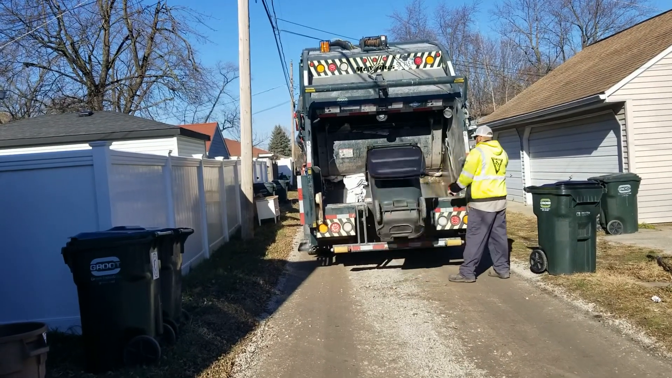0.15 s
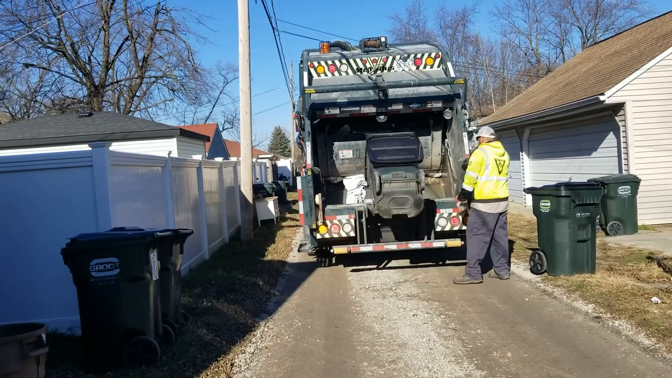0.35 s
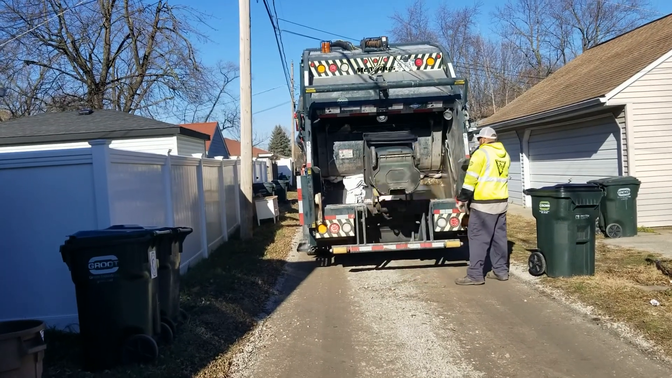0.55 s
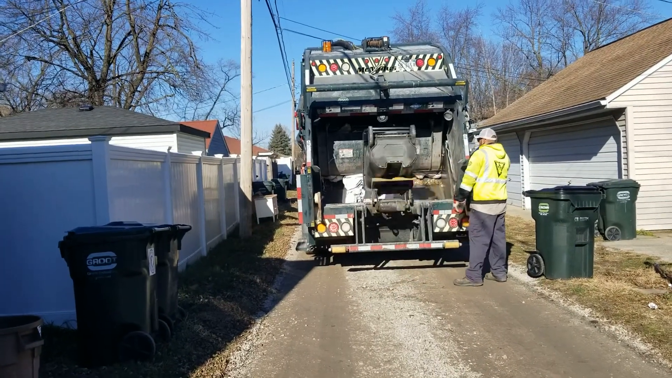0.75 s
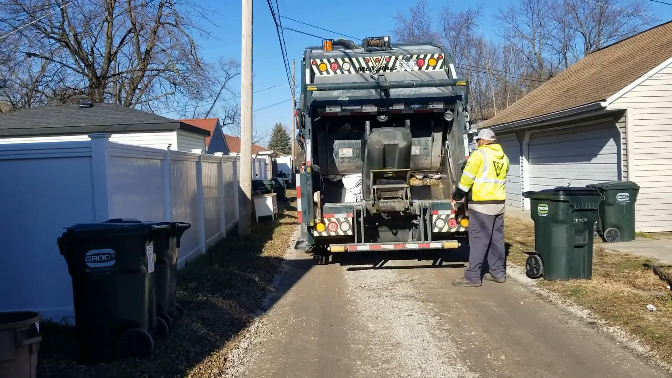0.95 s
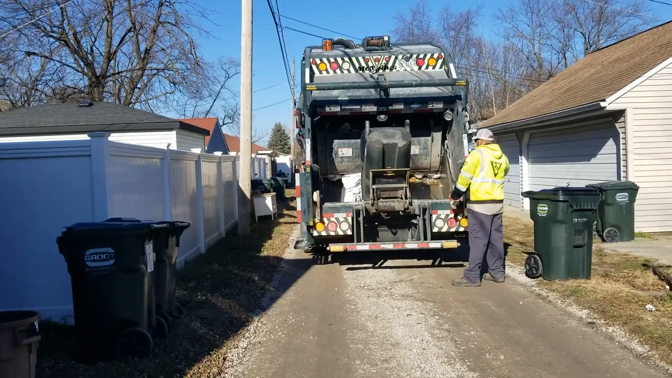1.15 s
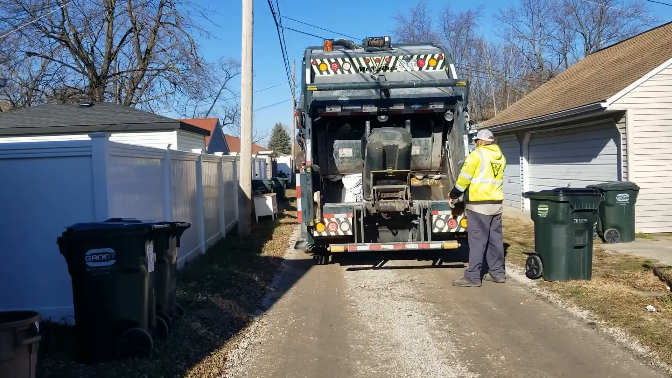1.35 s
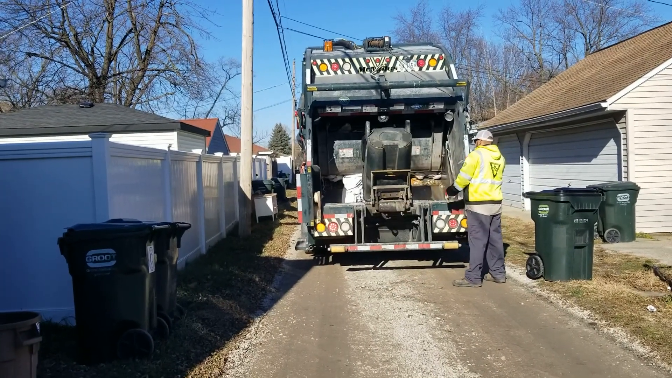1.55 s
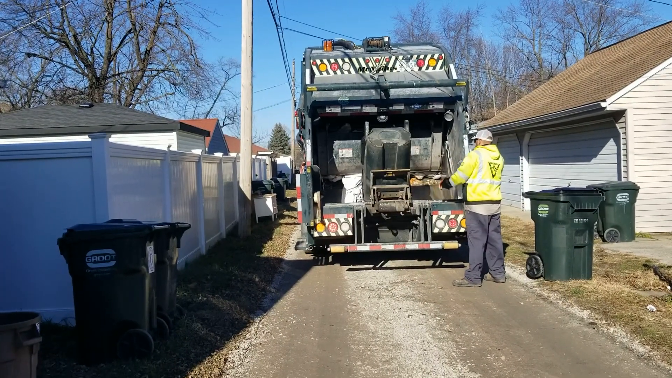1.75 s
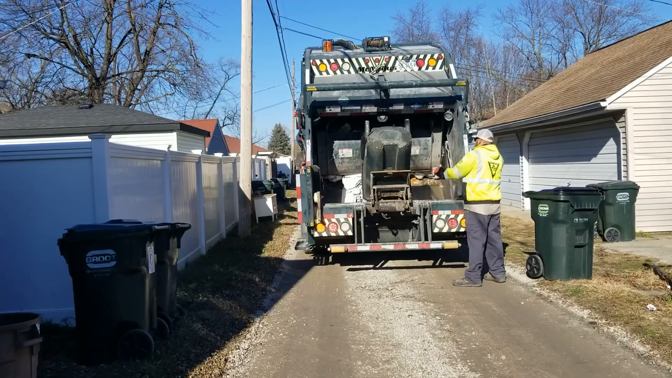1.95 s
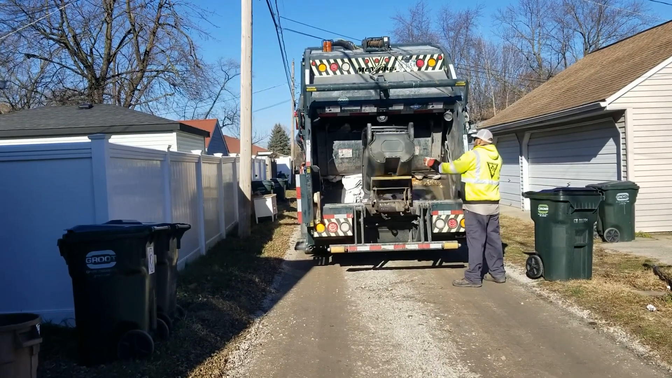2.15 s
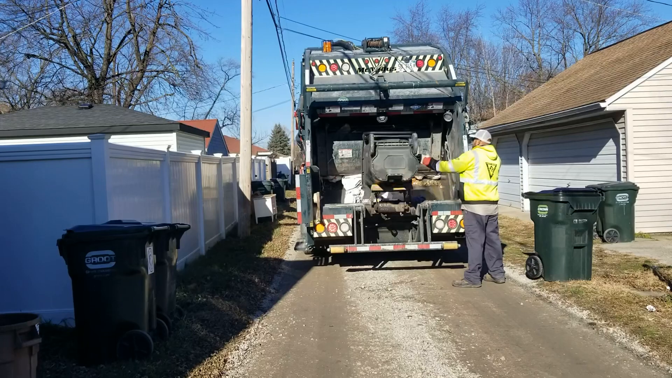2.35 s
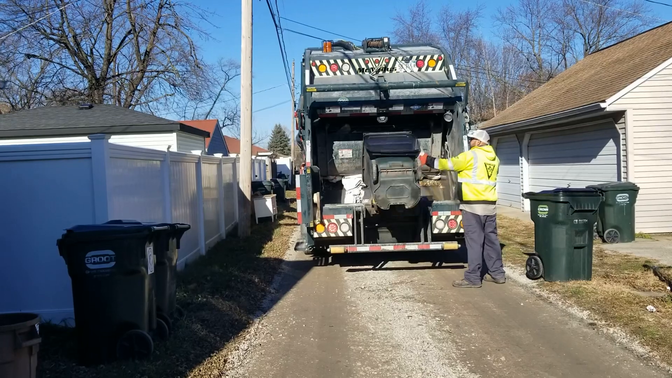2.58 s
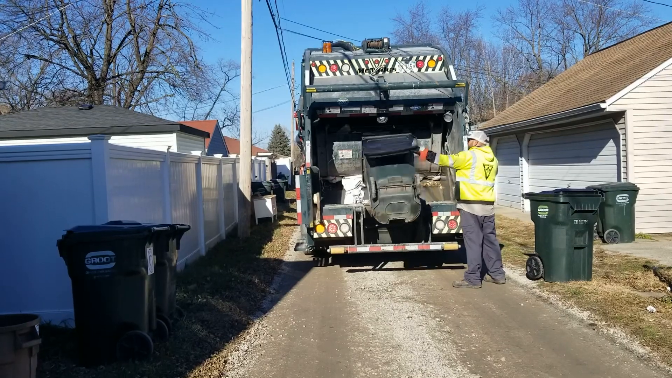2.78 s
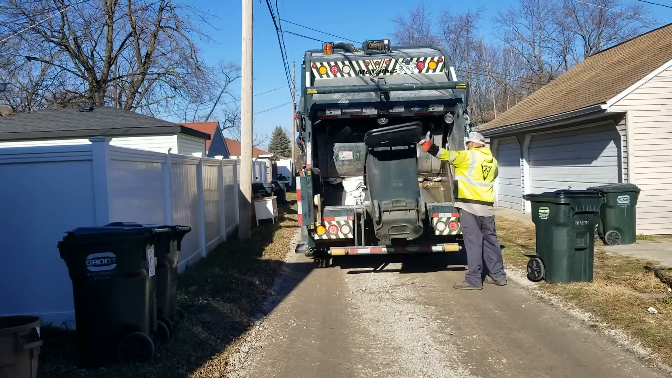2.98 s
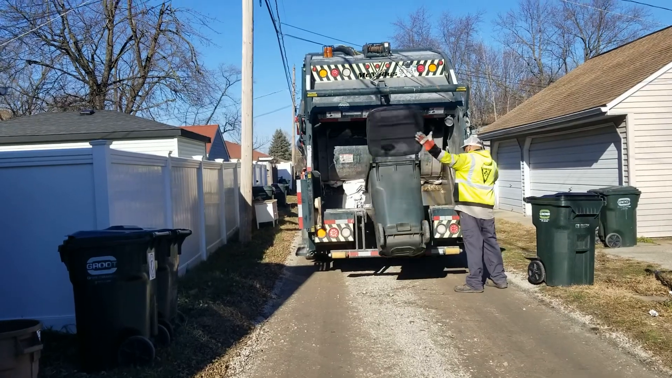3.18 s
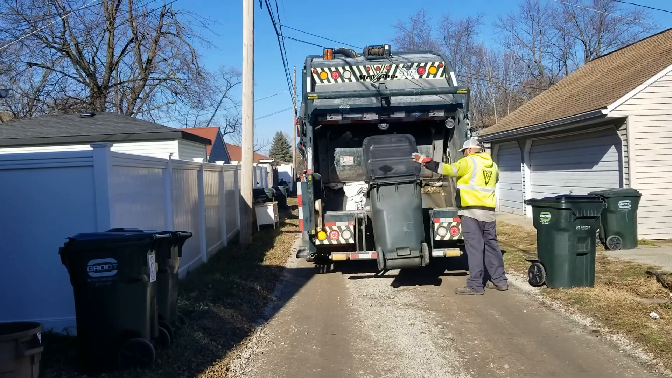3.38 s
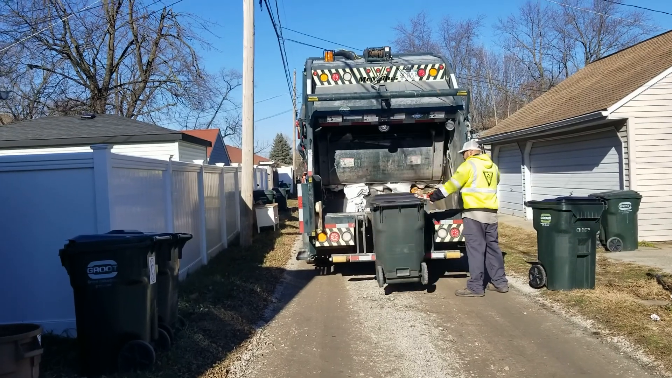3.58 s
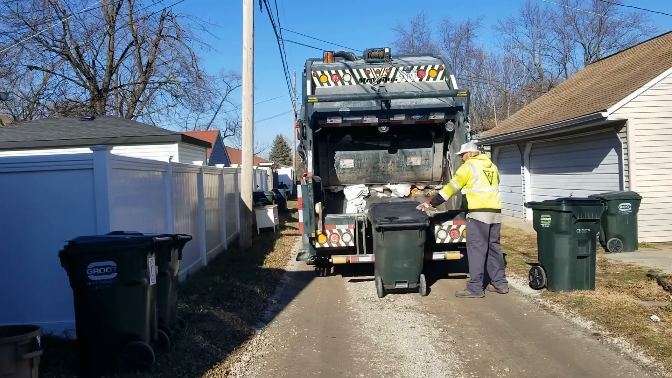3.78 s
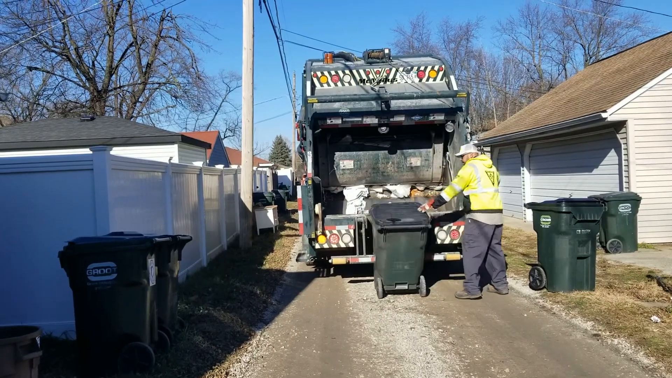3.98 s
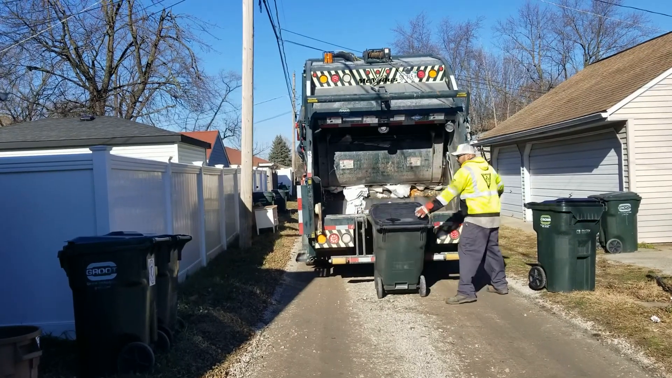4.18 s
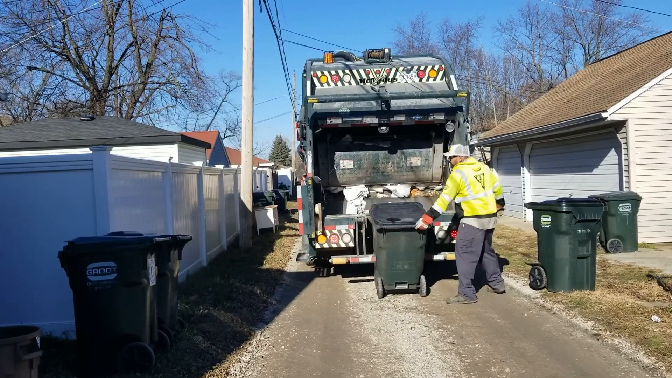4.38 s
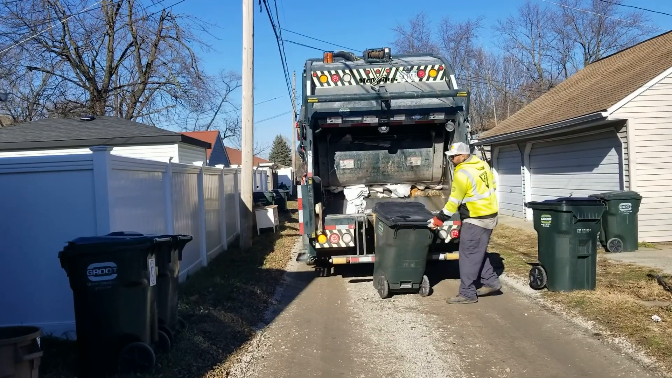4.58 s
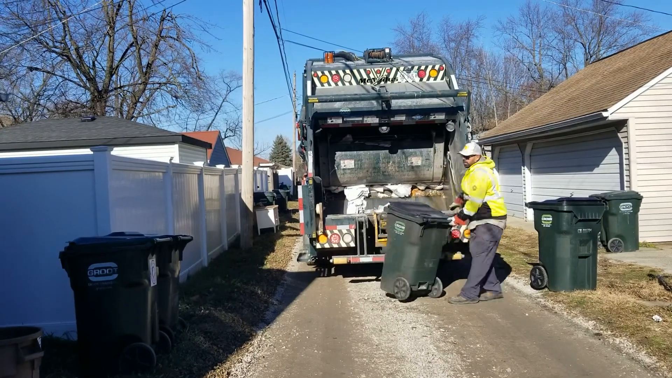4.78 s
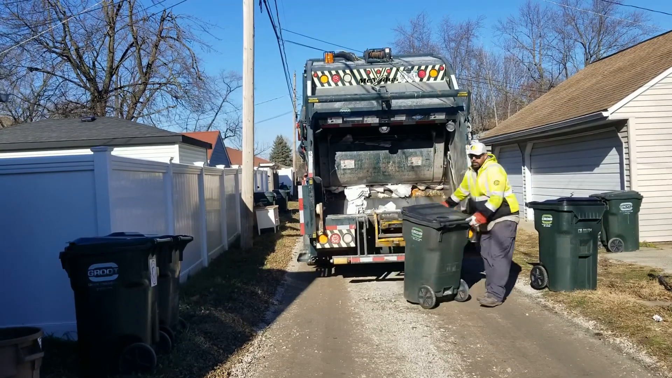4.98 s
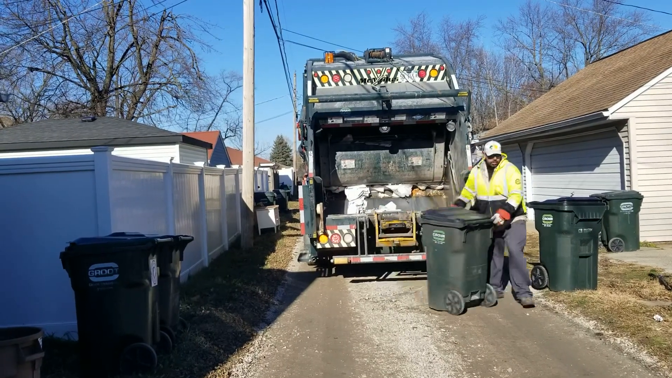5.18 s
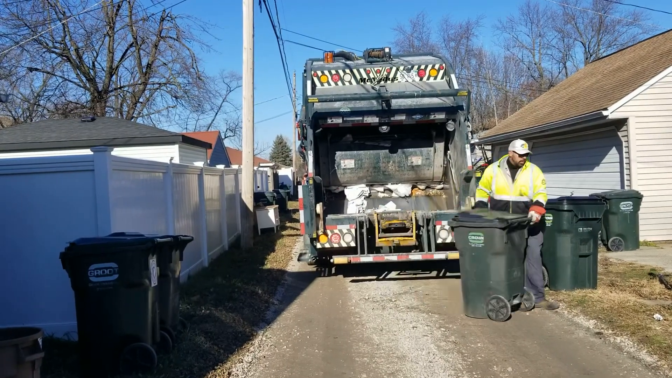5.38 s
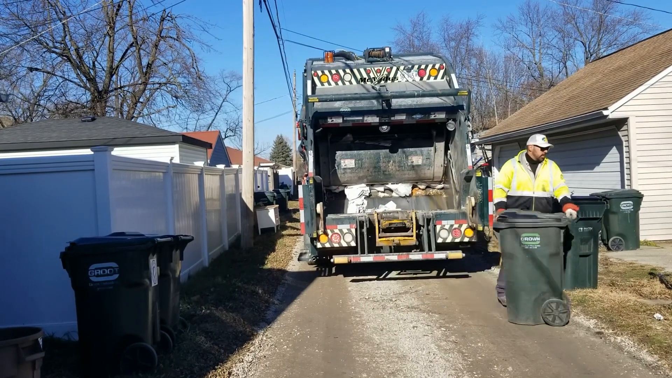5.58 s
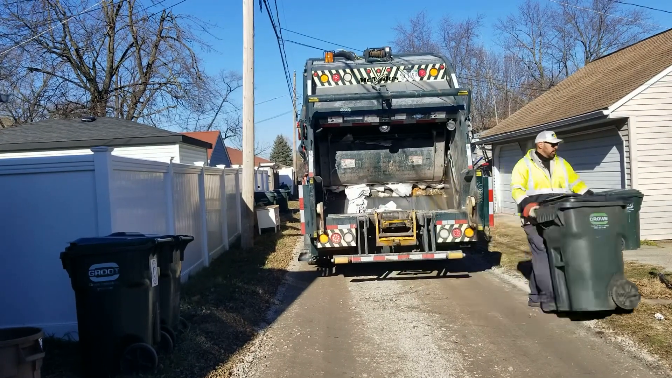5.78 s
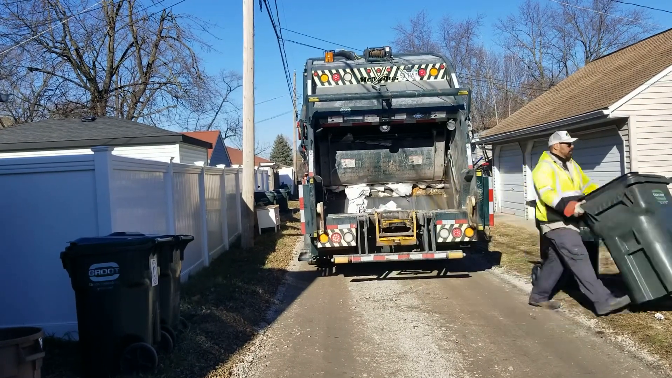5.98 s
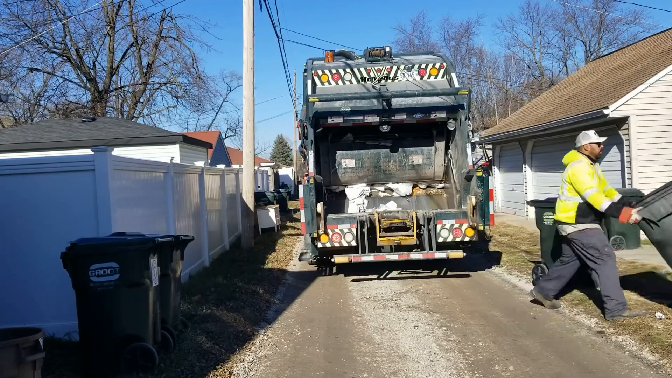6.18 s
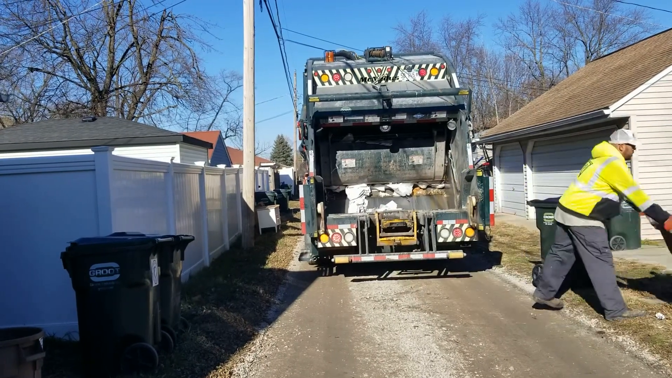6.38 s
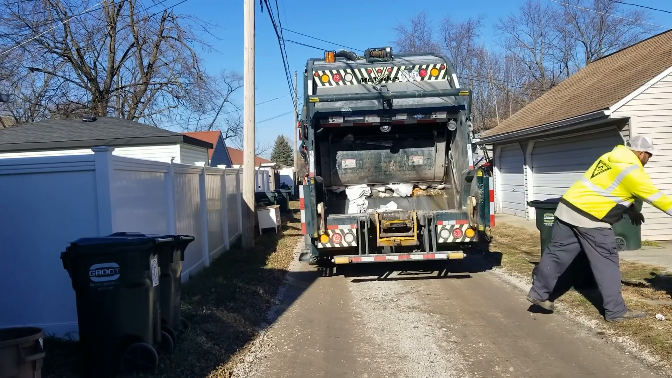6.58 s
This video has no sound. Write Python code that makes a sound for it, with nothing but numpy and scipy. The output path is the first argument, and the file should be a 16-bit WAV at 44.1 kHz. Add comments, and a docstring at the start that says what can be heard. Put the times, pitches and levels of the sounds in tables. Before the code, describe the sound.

Outdoors in an alley, a rear-loading garbage truck drones and clatters, heard from a few metres behind. The engine revs as the hydraulic tipper hisses and whines upward, with metallic bangs, a short dry squeal and latch clanks. Rubbish slides and bags rustle. More bangs follow as the cart comes down, its lid slams and the plastic shell thuds on the ground, then is wheeled off with hollow bumps and crunching steps.

```python
"""A rear-loading garbage truck stands in an alley: its diesel hums and revs as modulated sines over clatter noise.
A hydraulic tipper lifts a plastic cart with hiss and whine, blows ring the steel hopper, and a dry pivot squeals.
The latch clanks, rubbish slides and bags rustle; a valve whistles as the cart comes down.
The lid slams and the cart drops off, ringing its shell modes; boots crunch and wheels roll over broken paving.
Fence, garage and hopper return decaying noise as echoes of all the handling."""
import sys
import numpy as np
from scipy import signal
from scipy.fft import rfft, irfft
from scipy.io import wavfile
from scipy.ndimage import uniform_filter1d

SR = 44100
rng = np.random.default_rng(int(sys.argv[2]) if len(sys.argv) > 2 else 0)


def master(y):
    """Save y as 16-bit WAV."""
    cut = np.clip(np.atleast_2d(y).T, -1, 1)
    pcm = np.round(cut * 32767)  # scale
    wavfile.write(sys.argv[1], SR, pcm.astype(np.int16))


N = 292824
T = np.arange(N) / SR


def undb(db):
    """Level to amplitude: 20 dB is a factor of ten."""
    return 10 ** (np.asarray(db) / 20)


def unit(x):
    """Normalisation to an rms of 1."""
    return x / np.sqrt(np.mean(x ** 2) + 1e-20)


def curves(table):
    """Linear interpolation of a table's columns over time."""
    times, *columns = np.transpose(table)
    return [np.interp(T, times, column) for column in columns]


def walk(rate):
    """Band-limited random modulation: twice-smoothed random steps with an rms of 1."""
    length = int(SR / rate)
    steps = np.repeat(rng.standard_normal(N // length + 1), length)
    smooth = uniform_filter1d(uniform_filter1d(steps, length), length)
    return unit(smooth[:N])


def gate(start, end, attack_s, release_s):
    """Exponential growth up to the start, a hold, and exponential decay after the end."""
    return np.exp(np.minimum(T - start, 0) / attack_s - np.maximum(T - end, 0) / release_s)


def spells(table, attack_s, release_s):
    """Envelope of separate spells, the strongest prevailing; rows are start t/s, end t/s, level/dB."""
    return np.max([undb(db) * gate(start, end, attack_s, release_s) for start, end, db in table], axis=0)


def colour(x, points):
    """Minimum-phase filtering: a folded cepstrum turns f/Hz, level/dB points into a causal response."""
    size = 4096
    hz, db = np.transpose(points)
    bins_hz = np.fft.rfftfreq(size, 1 / SR)
    gain_db = np.interp(np.log(bins_hz + 1), np.log(hz), db)
    cepstrum = irfft(np.log(undb(gain_db)))
    cepstrum[1:size // 2] *= 2
    cepstrum[size // 2 + 1:] = 0
    response = irfft(np.exp(rfft(cepstrum)))
    return signal.fftconvolve(x, response[None], axes=-1)[:, :x.shape[-1]]


def resonate(x, modes):
    """Modal superposition: the push itself plus the ring of every mode."""
    rings = [undb(db) * signal.lfilter(*signal.iirpeak(hz, hz / width, fs=SR), x) for hz, width, db in modes]
    return x + sum(rings)


# side signal against mid: f/Hz, level/dB
SIDE_COLOUR = [(125, -20), (250, -11.5), (500, -9.5), (1000, -2), (4000, 2), (12000, -1)]


def spread(pair):
    """Mid-side diffuseness: two unrelated signals give like bass and diffuse treble."""
    side = colour(pair[1:], SIDE_COLOUR)[0]
    return np.array([pair[0] + side, pair[0] - side])


# exhaust note, six cycles to a crank turn: t/s, f/Hz, level/dB
EXHAUST_NOTE = [(0, 112.4, -28), (.27, 113.7, -31.5), (.8, 127, -33.5), (1.2, 158.9, -25),
                (1.55, 172.9, -21.5), (1.77, 176.3, -20.5), (1.95, 172, -20), (2.35, 157.6, -23),
                (2.7, 149.8, -29), (3.05, 146.4, -27), (3.36, 142.5, -32.5), (3.46, 142.3, -48),
                (3.98, 142.7, -43.5), (4.16, 142.5, -31.5), (4.55, 145.1, -25.5), (5.45, 141.8, -27.5),
                (6.05, 139.2, -30.5), (6.64, 140.6, -31)]


def exhaust_note():
    """Engine speed governs pitch: exhaust frequency and level through time."""
    return curves(EXHAUST_NOTE)


# the tipper lifts, holds, lowers and settles: start t/s, end t/s, oil hiss level/dB, hiss fading/(dB per s),
# pump whine level/dB, injector clatter level/dB, chassis rumble level/dB (levels before the machinery's trims)
TIPPER_STROKES = [(-.1, 0.836, -49, -2, -47, -45.5, -43), (0.917, 2.412, -54, 2.5, -68, -42, -36.5),
                  (2.447, 3.426, -59.5, 2, -47, -45, -40.5), (3.496, 3.95, -58, 4, -63, -42.5, -39)]
LOAD_RISE_S, LOAD_FALL_S = .089, .09
# the same four sounds with the tipper at rest
IDLE_DB = [-71, -59.5, -48, -44]
PUMP_FADE_DB_PER_S = 2


def load():
    """Hydraulic loading: each stroke raises hiss, pump, clatter and rumble above idle."""
    gains = undb(IDLE_DB)[:, None] * np.ones(N)
    for start, end, hiss_db, hiss_fade, *others_db in TIPPER_STROKES:
        stroke = undb([hiss_db, *others_db])[:, None] * gate(start, end, LOAD_RISE_S, LOAD_FALL_S)
        elapsed = np.clip(T - start, 0, end - start)
        stroke[:2] *= undb(-np.outer([hiss_fade, PUMP_FADE_DB_PER_S], elapsed))
        gains = np.maximum(gains, stroke)
    return gains


# weaker crank orders: multiple of the crank rate, mean level/dB
CRANK_ORDERS = [(3, -51), (4, -49), (5, -53), (12, -55), (18, -60), (24, -57), (30, -60)]


def engine(exhaust_hz, exhaust_db, flutter_db=.6, throb_db=1.5):
    """Harmonic orders of rotation: a fluttering exhaust drone, slowly throbbing under load, and crank orders."""
    phase = 2 * np.pi * np.cumsum(exhaust_hz) / SR
    crank = phase / 6
    working = gate(TIPPER_STROKES[0][0], TIPPER_STROKES[-1][1], LOAD_RISE_S, LOAD_FALL_S)
    drone_db = exhaust_db + flutter_db * walk(35) + throb_db * working * walk(12.1)
    drone = undb(drone_db) * np.sin(phase)
    orders = sum(undb(db + 2 * walk(9)) * np.sin(k * crank + .5 * walk(6)) for k, db in CRANK_ORDERS)
    return np.sqrt(2) * (drone + orders)


# multiple of the exhaust note; mean level at top speed and its fall per Hz below
GEAR_RATIO, GEAR_DB, GEAR_DB_PER_HZ = 9.25, -46, .45


def gears(exhaust_hz):
    """Gear meshing at a fixed ratio: a wavering whine that comes up with the revs."""
    phase = 2 * np.pi * np.cumsum(GEAR_RATIO * exhaust_hz) / SR + .4 * walk(25)
    below_top_hz = exhaust_hz.max() - exhaust_hz
    return np.sqrt(2) * np.sin(phase) * undb(GEAR_DB - GEAR_DB_PER_HZ * below_top_hz + 2 * walk(15))


# pipes and oil tank that radiate the pump's harmonics: f/Hz, width f/Hz, level/dB
PIPE_MODES = [(651, 100, -11.5), (1512, 22, 3), (1950, 80, 10.5)]


def pump_whine(exhaust_hz, gain, second_db=-13, third_db=-20):
    """Source and resonator: harmonics of the geared pump swell as they cross the pipe resonances."""
    phase = 2 * np.pi * np.cumsum(4.44 * exhaust_hz) / SR
    harmonics = [undb(db + 2 * walk(24.47)) * np.sin(k * (phase + .48 * walk(22)))
                 for k, db in enumerate((0, second_db, third_db), 1)]
    return np.sqrt(2) * resonate(sum(harmonics), PIPE_MODES) * gain


# panels of the truck body: f/Hz, width f/Hz, level/dB
BODY_PANELS = [(496, 67, 1.5), (730, 20, 3), (973, 95, 9.5), (1085, 93, 4), (1535, 164, 6.5),
               (2010, 86, -6), (2870, 43, -13)]
# spectral density of the combustion clatter: f/Hz, relative level/dB
CLATTER_SPECTRUM = [(140, -40.5), (230, -8), (296, -1.5), (328, -5.5), (354, -9.5), (536, -12.5), (650, -5),
                    (813, -22), (1080, -18.5), (1810, -20), (1980, -15.5), (2200, -19), (2710, -20.5),
                    (3330, -25), (8000, -37.5), (10400, -78), (17600, -120)]


def clatter(exhaust_hz, gain, knock_depth=.025, repeat_db=1, trim_db=3):
    """Cyclostationary noise: combustion clatter partly repeats each engine cycle and rings the panels."""
    cycles = np.cumsum(exhaust_hz) / SR / 12  # two crank turns each
    size = 3600
    position = cycles % 1 * size
    pattern = np.array([np.interp(position, np.arange(size), p) for p in rng.standard_normal((2, size))])
    firing = np.cos(np.pi * np.cumsum(exhaust_hz) / SR)
    knocks = rng.standard_normal((2, N)) + undb(repeat_db) * pattern
    knocks *= (1 + knock_depth * firing) * undb(1.25 * walk(40))
    return unit(spread(colour(resonate(knocks, BODY_PANELS), CLATTER_SPECTRUM))) * gain * undb(trim_db)


# spectral density of the chassis rumble: f/Hz, relative level/dB
RUMBLE_SPECTRUM = [(20, -16), (33, -2), (46, 12), (62, 9), (85, 2), (115, 7.5), (160, 8.5), (210, 0.5),
                   (300, -28.5), (450, -36), (900, -67)]


def rumble(gain, trim_db=3, heave_db=2):
    """Band-shaped random vibration: chassis noise with a slow heave in level."""
    noise = spread(colour(rng.standard_normal((2, N)), RUMBLE_SPECTRUM))
    return unit(noise) * gain * undb(trim_db + heave_db * walk(5.05))


# narrow resonances of the oil valve: f/Hz, width f/Hz, level/dB
OIL_VALVE_MODES = [(7120, 60, -1), (10300, 50, -4), (11400, 80, -5), (12500, 900, -12)]
# spectral density of the oil hiss: f/Hz, relative level/dB
HISS_SPECTRUM = [(300, -29), (2000, -29), (4000, -25), (6000, 9), (7500, 3.5), (9000, 6), (11500, 6.5),
                 (13000, 4), (16000, 3)]


def oil_hiss(gain, trim_db=2):
    """Flow noise: oil forced through the valve excites its narrow resonances."""
    oil = colour(resonate(rng.standard_normal((2, N)), OIL_VALVE_MODES), HISS_SPECTRUM)
    return unit(oil) * gain * undb(trim_db + .36 * walk(28))


# what the contacts radiate: f/Hz, relative level/dB
CONTACT_SPECTRUM = [(25, -16), (60, 0), (200, -1), (500, -3), (1000, -6), (2000, -9), (3200, -11),
                    (5000, -19), (6500, -20), (8000, -26), (12500, -24), (16000, -29)]
# boom, body, clack and tick: low f/Hz, high f/Hz, ring relative to the blow's t60, trim level/dB, side share
BLOW_RANGES = [(39.2, 230, 1.59, -2, 0.056), (224, 1100, 1.26, -5, 0.24), (1037, 2640, 1.16, -5.5, 0.65),
               (4040, 12900, 1.14, -1.5, 1)]
CLACK_SHARE = .58  # hardness lifts the tick fully and the clack by this share
BLOW_RISE_S = .001


def blows(table, modes, db, clack_db, tick_db, chatter_db, snap, snap_s=.022, place_db=3):
    """Impact excitation: dying chatter rings the struck body, brighter for hard contacts."""
    count = SR // 2
    t = np.arange(count) / SR
    onset = (1 - np.exp(-t / BLOW_RISE_S)) * (1 + snap * np.exp(-t / snap_s))
    out = np.zeros((2, N + count))
    for s, strength, thump, hardness, t60 in table:
        levels = strength + np.array([thump, 0, clack_db + CLACK_SHARE * hardness, tick_db + hardness])
        jolts = np.repeat(rng.standard_normal(count // 64 + 1), 64)[:count]
        push = rng.standard_normal((2, count)) * undb(chatter_db * jolts)
        push = colour(push * onset, CONTACT_SPECTRUM)
        # the place of the blow decides which modes speak
        struck = [(hz, width, gain + place_db * rng.standard_normal()) for hz, width, gain in modes]
        start = int(s * SR)
        for level_db, (lo, hi, ring, trim_db, side) in zip(levels, BLOW_RANGES):
            band = signal.butter(3, [lo, hi], "band", fs=SR, output="sos")
            fading = push * np.exp(-np.log(1000) * t / (t60 * ring))
            near = [m for m in struck if lo / np.sqrt(2) < m[0] < hi * np.sqrt(2)]
            pair = signal.sosfilt(band, resonate(fading, near))
            pair /= np.std(pair[:, :int(.03 * SR)], axis=1, keepdims=True)  # level of the first 30 ms
            stereo = pair[0] + side * np.outer([1, -1], pair[1])
            out[:, start:start + count] += undb(level_db + trim_db + db) * stereo
    return out[:, :N]


def impulses(table):
    """Impulse train: one for each row that begins t/s, level/dB."""
    times, db = np.transpose(table)[:2]
    return np.bincount((times * SR).astype(int), undb(db), N)[:N]


def contacts(table, modes, db, soft_hz):
    """Impulse response: the first touch of each blow is a single push that sounds the body's modes."""
    push = signal.lfilter(*signal.butter(2, soft_hz, fs=SR), signal.unit_impulse(SR // 4))
    click = resonate(colour(push[None], CONTACT_SPECTRUM), modes)
    return undb(db) * signal.fftconvolve(impulses(table), click[0] / np.abs(click).max())[:N]


# blows of tipper and rubbish: t/s, strength level/dB, extra thump level/dB, contact hardness level/dB, base t60 t/s
BLOWS_ON_HOPPER = [(.048, -35, 4.5, 1, 0.5), (.319, -23.5, -0.5, -2, 0.095), (.362, -28, 4, 4, 0.21),
                   (.488, -34.5, -8, -2, 0.054), (.551, -34, 3.5, 4.5, .12), (.598, -32, -11, 6, 0.24),
                   (.847, -33.5, -1, 6, 0.36), (.917, -27.5, 6.5, -6, 0.31), (.931, -25.5, 4.5, 9.5, 0.13),
                   (.949, -21.5, 2, -29, 0.17), (.992, -26, 6.5, -8, 0.12), (1.053, -33, 5, -2, 0.23),
                   (1.120, -24.5, -2.5, -5.5, 0.14), (1.171, -29, 3.5, 1.5, 0.078),
                   (1.216, -32.5, 6, 2, 0.35), (1.294, -21, -9, -10, 0.15), (1.334, -38, 12, 11, 0.18),
                   (1.379, -28, -4.5, 5.5, 0.53), (1.933, -27.5, -19, 0, 0.13), (2.008, -24.5, 2, 2, 0.17),
                   (2.042, -29.5, 9.5, -13, .18), (2.139, -30.5, 1, -12, 0.2), (2.263, -29.5, -1, -7, .15),
                   (2.348, -26, -3, -4, 0.29), (2.413, -23.5, -9, 1, 0.26), (2.474, -37, 13.5, 7.5, .13),
                   (2.807, -34.5, 5, -21, 0.21)]
# the steel hopper: f/Hz, width f/Hz, mean level/dB
STEEL_MODES = [(47.6, 10.7, 27.5), (69.5, 5.1, -2), (103, 8.1, 21.5), (162, 30, 6), (232, 13, -6),
               (352, 39, 9.5), (552, 133, 14.5), (689.5, 14, 19), (1045, 124, 8), (1587, 220, 4.5),
               (1945, 150, 4), (2910, 74, 6), (4160, 220, -1)]


def hopper():
    """Modal ringing of struck steel: tipper and rubbish strike the hopper."""
    out = blows(BLOWS_ON_HOPPER, STEEL_MODES, db=-2, clack_db=-2.5, tick_db=-18.5, chatter_db=2, snap=.38)
    return out + contacts(BLOWS_ON_HOPPER, STEEL_MODES, db=-.5, soft_hz=3000)


# dry pivot: t/s, mean f/Hz, level/dB
PIVOT_SQUEAL = [(.58, 2150, -65), (.602, 2167, -27), (.623, 2175, -23), (.645, 2218, -32),
                (.672, 2190, -27.5), (.69, 2181, -21.5), (.713, 2178, -38.5), (.738, 2162, -32),
                (.78, 2136, -73)]


def squeal(second_db=-21, third_db=-22):
    """Stick-slip friction: the tipper's pivot sounds near one steel resonance, with weak harmonics."""
    hz, db = curves(PIVOT_SQUEAL)
    phase = 2 * np.pi * np.cumsum(hz * (1 + .0027 * walk(206.2))) / SR
    harmonics = [undb(d + 2 * walk(64.5)) * np.sin(k * phase + .5 * walk(221.5))
                 for k, d in enumerate((second_db, third_db), 2)]
    sounding = (T > PIVOT_SQUEAL[0][0]) * (T < PIVOT_SQUEAL[-1][0])
    return np.sqrt(2) * (np.sin(phase) + sum(harmonics)) * undb(db) * sounding


def pan(x, right_db):
    """Interaural level difference: the balance tips to the right."""
    return x * undb(np.array([[-right_db], [right_db]]) / 2)


# the tipper's steel latch snapping against its bar: t/s, level/dB
LATCH_CLANKS = [(.849, -24), (.927, -21), (1.935, -30), (2.010, -20), (2.351, -29)]
# the ring of the latch: f/Hz, level/dB, t60 t/s
LATCH_RING = [(960, -19.5, 0.48), (1572, -4, 0.1), (1678, -4, 0.055), (1620, -19, 0.19), (2420, -33, 0.11),
              (2800, -23, 0.12), (4210, -31, .08)]


def latch():
    """Damped free vibration: short steel rings, slightly out of phase between the microphones."""
    t = np.arange(SR // 3) / SR
    ring = sum(undb(db - 60 * t / t60) * np.sin(2 * np.pi * hz * t + .26 * rng.standard_normal((2, 1)))
               for hz, db, t60 in LATCH_RING)
    return signal.fftconvolve(impulses(LATCH_CLANKS)[None], ring, axes=-1)[:, :N]


def random_hits(rate, scatter_db):
    """Poisson-like shot noise: stereo contacts at a mean rate per second, scattered in strength."""
    hits = (rng.random(N) < rate / SR) * undb(scatter_db * np.clip(rng.standard_normal(N), -2, 2))
    return hits * rng.standard_normal((2, N))


def rattle(table, modes, rate, scatter_db, top_hz, attack_s, release_s):
    """Random modal excitation: many small contacts, dulled by softness, ring a body."""
    pushes = signal.lfilter(*signal.butter(1, top_hz, fs=SR), random_hits(rate, scatter_db))
    ringing = resonate(colour(pushes, CONTACT_SPECTRUM), modes)
    return unit(spread(ringing)) * spells(table, attack_s, release_s)


# loose rubbish slides: start t/s, end t/s, level/dB
RUBBISH_SLIDES = [(1.05, 1.55, -35.5), (2.05, 2.42, -39.5)]


def rubbish():
    """Random modal excitation: sliding rubbish rings the hopper."""
    return rattle(RUBBISH_SLIDES, STEEL_MODES, rate=220, scatter_db=3, top_hz=3501, attack_s=.045, release_s=.1)


def crackle(table, rate, scatter_db, low_hz, attack_s, release_s):
    """High-passed shot noise: spells of dense, bright ticks."""
    bright = signal.lfilter(*signal.butter(2, low_hz, "high", fs=SR), random_hits(rate, scatter_db))
    return unit(bright) * spells(table, attack_s, release_s)


# plastic bags tumble out: start t/s, end t/s, level/dB
BAG_RUSTLES = [(1.3, 1.42, -47), (1.52, 1.58, -47), (1.72, 1.85, -50)]


def bags():
    """Shot noise of thin plastic: tumbling bags rustle in dense ticks."""
    return crackle(BAG_RUSTLES, rate=2700, scatter_db=-2, low_hz=3900, attack_s=.028, release_s=.045)


# loudest moment, mean level there, fall on either side
WHISTLE_S, WHISTLE_DB, WHISTLE_DB_PER_S = 3.16, -55, 45


def valve_whistle(exhaust_hz, whistle_hz=2690):
    """Flow tone: the valve whistles as the cart comes down, its pitch weakly following engine speed."""
    hz = whistle_hz * (exhaust_hz / 145) ** .3
    tone = np.sin(2 * np.pi * np.cumsum(hz) / SR + 1.1 * walk(40))
    level_db = WHISTLE_DB - WHISTLE_DB_PER_S * np.abs(T - WHISTLE_S)
    return np.sqrt(2) * undb(level_db + 2 * walk(27.2)) * tone


# knocks of the cart's lid, shell and wheels:
# t/s, strength level/dB, extra thump level/dB, contact hardness level/dB, base t60 t/s
KNOCKS_OF_CART = [(3.505, -17.5, 5.5, 7.5, 0.2), (3.514, -15, -0.5, 12, 0.21), (3.53, -15.5, -4, 8, 0.2),
                  (3.557, -20, -8, 0, 0.13), (3.718, -19.5, 0.5, -14, .16), (3.744, -27, -2.5, -15, .18),
                  (3.783, -20.5, 0.5, -18, 0.16), (3.824, -29, 3.5, 1.5, 0.15),
                  (3.856, -31, -9, 15.5, 0.19), (3.966, -27.5, -2, -2.5, 0.18), (4.494, -40.5, 7, 5, 0.1),
                  (4.764, -39, 8.5, 9, .16), (4.869, -24, 6, -16, .16), (4.893, -23, 7, 5.5, 0.18),
                  (4.94, -22.5, 3, -10, 0.31), (5.044, -21, 0.5, -6, 0.62), (5.135, -24.5, 4.5, 6, 0.15),
                  (5.217, -22, 1, -22, .18), (5.286, -16.5, -2, -18, 0.18),
                  (5.327, -16.5, 1.5, -13.5, 0.17), (5.363, -15.5, -8, -16.5, 0.16),
                  (5.426, -26, 5.5, -5, 0.42), (5.466, -19.5, 2.5, -6, .19), (5.486, -19.5, -3, -2, 0.21),
                  (5.526, -19, 2.5, -11, 0.3), (5.616, -18, -7, -12, 0.19), (5.634, -24, 9.5, -2, .17),
                  (6.341, -26.5, 8, -1.5, .19), (6.371, -33.5, 9, 6, .2), (6.449, -31, 11, 9, .18)]
# the hollow plastic cart: f/Hz, width f/Hz, mean level/dB
PLASTIC_MODES = [(79.7, 7.5, 22.5), (108, 41, 20), (146, 10.2, 18.5), (178.6, 19.5, 21), (233.6, 49, 12),
                 (321, 36, 10.5), (395, 22, 8.5), (477, 68, 11.5), (587, 103, 11), (664, 26, 13),
                 (932, 4, -22), (1108, 160, 7), (1250, 14, -21), (1578, 100, 9), (1750, 100, 2),
                 (2093, 68, 5), (2860, 79, 3), (3264, 21, 4.5), (4250, 530, -2.5)]
# wheels run over broken paving: start t/s, end t/s, level/dB
WHEEL_ROLLS = [(4.92, 5.3, -35.5), (5.3, 5.7, -38), (6.38, 6.58, -41.5)]


def cart(low_hz=60):
    """Modal ringing of a hollow shell: lid, drop and rolling wheels excite the plastic cart."""
    out = blows(KNOCKS_OF_CART, PLASTIC_MODES, db=-2, clack_db=-6, tick_db=-21, chatter_db=2.5, snap=.14)
    out += contacts(KNOCKS_OF_CART, PLASTIC_MODES, db=-2, soft_hz=2500)
    out += rattle(WHEEL_ROLLS, PLASTIC_MODES, rate=84, scatter_db=0, top_hz=1060, attack_s=.05, release_s=.06)
    # the shell is too small to radiate the deepest bass
    return signal.sosfilt(signal.butter(2, low_hz, "high", fs=SR, output="sos"), out)


# boots on grit and dry grass: start t/s, end t/s, level/dB
BOOT_STEPS = [(4.895, 4.915, -45), (5.137, 5.155, -42), (5.485, 5.51, -61), (6.355, 6.385, -46.5),
              (6.45, 6.47, -50)]


def boots():
    """Shot noise of crushed grains: steps crunch on grit and dry grass."""
    return crackle(BOOT_STEPS, rate=1300, scatter_db=4, low_hz=4500, attack_s=.0048, release_s=.0088)


def alley(x, t60=.5, wet_db=-16, top_hz=3500):
    """Diffuse reverberation: scattered echoes from fence, garage and hopper, different on each side."""
    t = np.arange(SR) / SR
    echoes = rng.standard_normal((2, SR)) * np.exp(-np.log(1000) * t / t60) * (t > .014)
    echoes = spread(signal.lfilter(*signal.butter(1, top_hz, fs=SR), echoes))
    echoes = unit(echoes) / np.sqrt(SR)  # unit energy
    return x + undb(wet_db) * signal.fftconvolve(x, echoes, axes=-1)[:, :N]


def scene():
    """Superposition of sources: the truck sounds directly, the handling also through the alley's echoes."""
    exhaust_hz, exhaust_db = exhaust_note()
    hiss_gain, pump_gain, clatter_gain, rumble_gain = load()
    truck = engine(exhaust_hz, exhaust_db) + gears(exhaust_hz) + pump_whine(exhaust_hz, pump_gain)
    truck = truck + clatter(exhaust_hz, clatter_gain) + rumble(rumble_gain) + oil_hiss(hiss_gain)
    tipper = hopper() + pan(squeal(), right_db=6.5) + latch()
    handling = alley(tipper + rubbish() + bags() + cart() + boots())
    return truck + valve_whistle(exhaust_hz) + handling


# the left microphone against the right: f/Hz, level/dB
MICROPHONE_COLOUR = [(200, .5), (400, 0.5), (700, -1), (1290, -3), (2400, 0.8), (4400, -2.5), (8100, 0.5),
                     (15000, 2)]
TOP_HZ = 15750


def record(dry):
    """Transducer response: two microphones differ in colour, peaks saturate smoothly and the top is cut."""
    ports = []
    for x, sign in zip(dry, (1, -1)):
        half_difference = [(hz, sign * db / 2) for hz, db in MICROPHONE_COLOUR]
        ports.append(colour(x[None], half_difference)[0])
    ports = np.array(ports)
    rounded = ports / (1 + (ports / .88) ** 6) ** (1 / 6)
    return signal.sosfilt(signal.ellip(12, .2, 80, TOP_HZ, fs=SR, output="sos"), rounded)


dry = scene()
out = record(dry)
master(out)
```